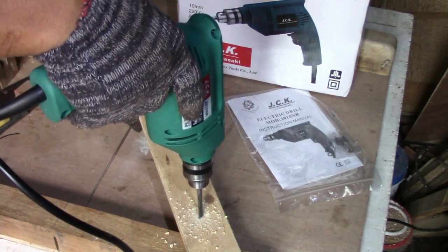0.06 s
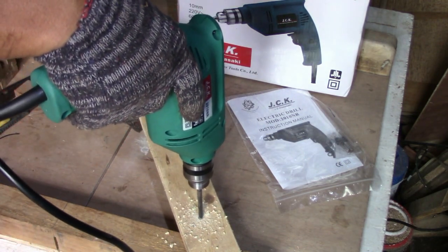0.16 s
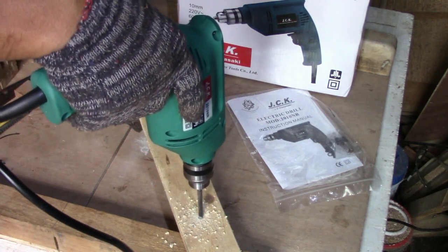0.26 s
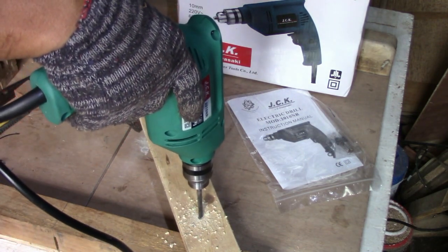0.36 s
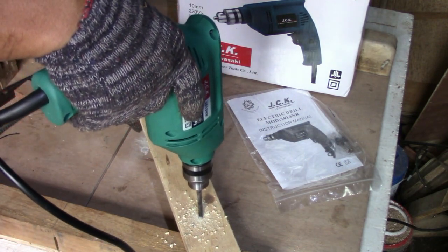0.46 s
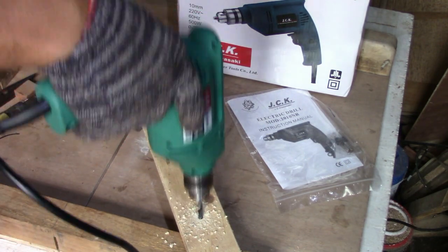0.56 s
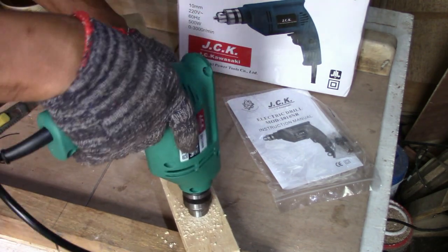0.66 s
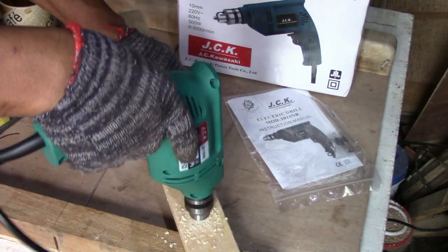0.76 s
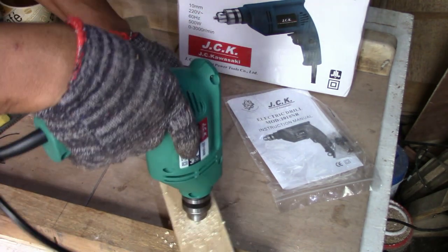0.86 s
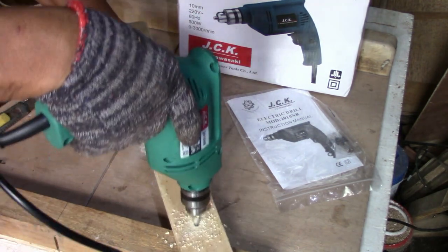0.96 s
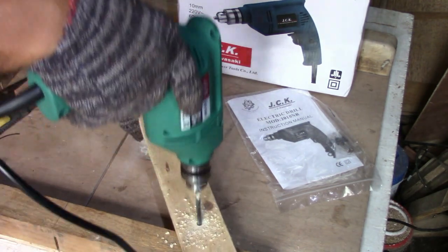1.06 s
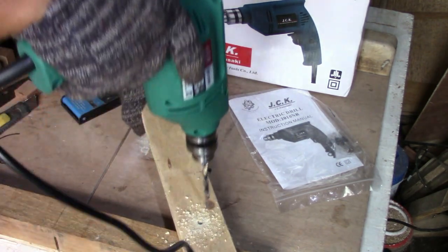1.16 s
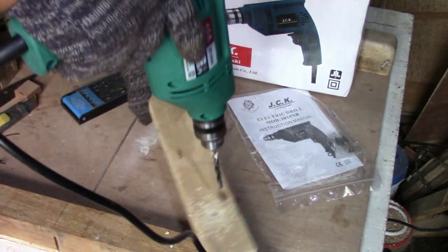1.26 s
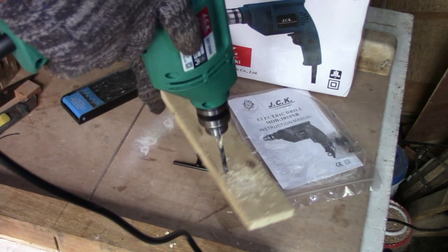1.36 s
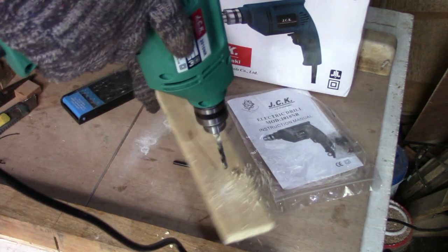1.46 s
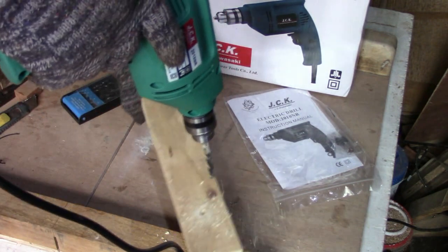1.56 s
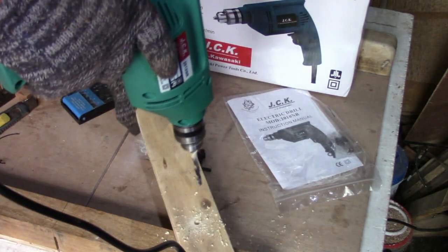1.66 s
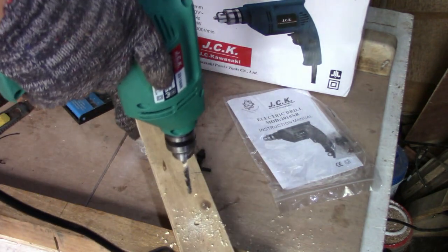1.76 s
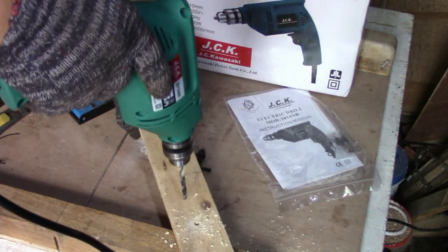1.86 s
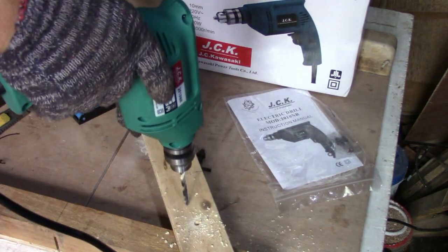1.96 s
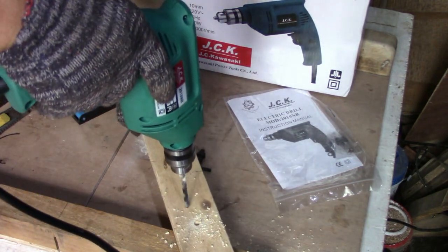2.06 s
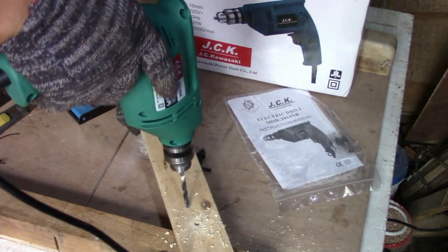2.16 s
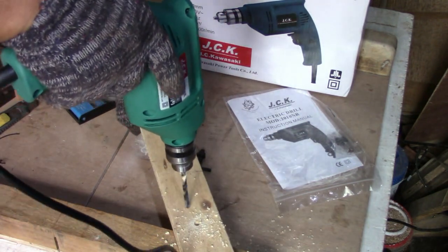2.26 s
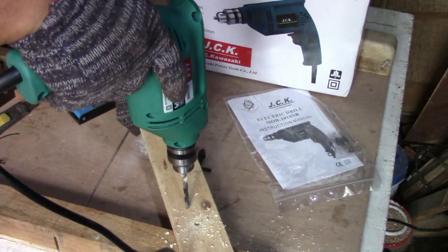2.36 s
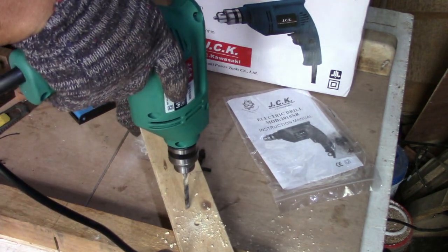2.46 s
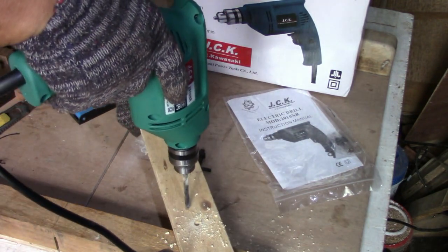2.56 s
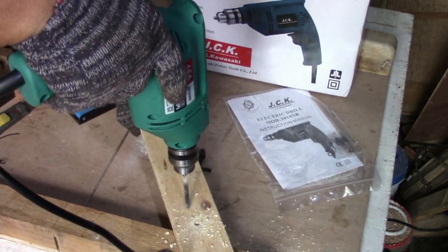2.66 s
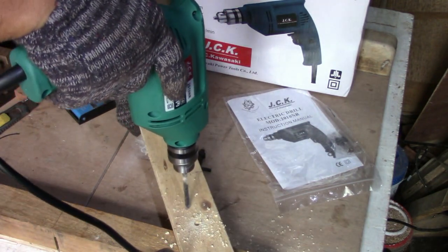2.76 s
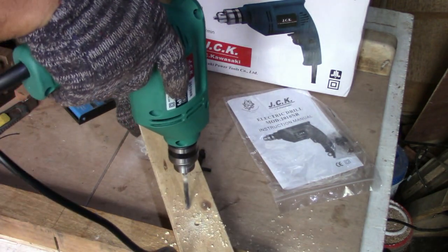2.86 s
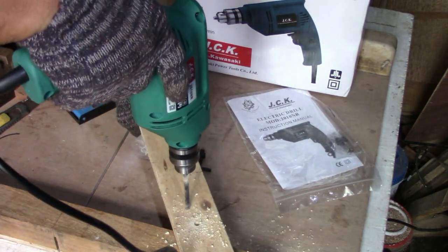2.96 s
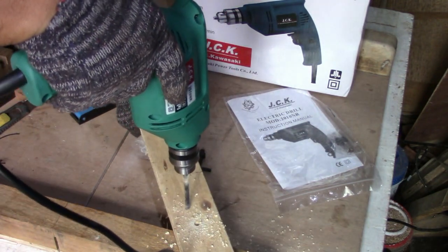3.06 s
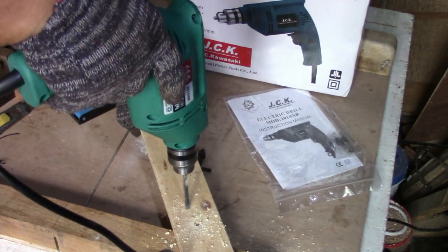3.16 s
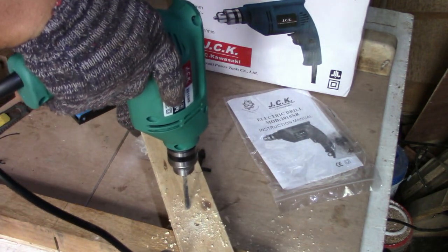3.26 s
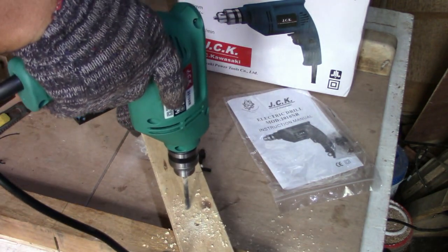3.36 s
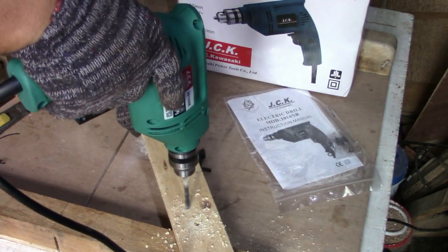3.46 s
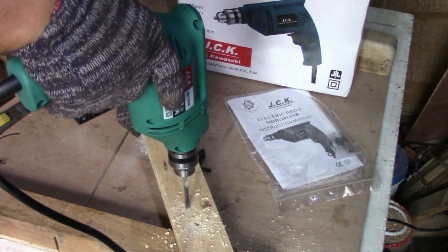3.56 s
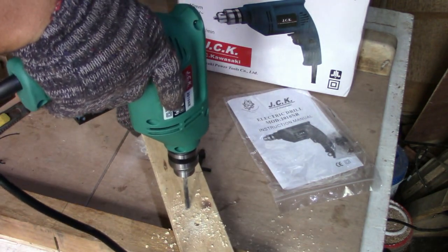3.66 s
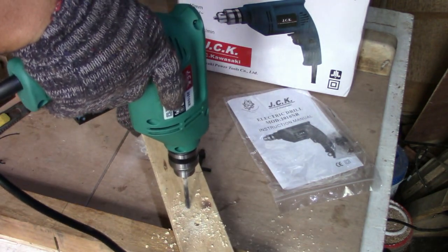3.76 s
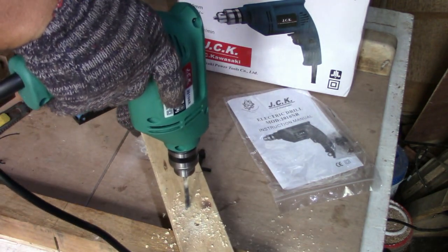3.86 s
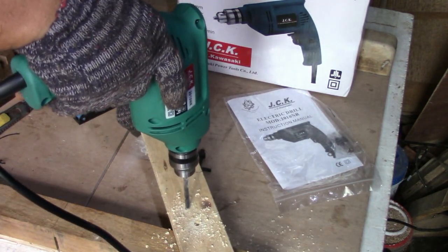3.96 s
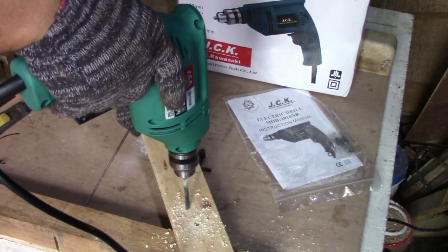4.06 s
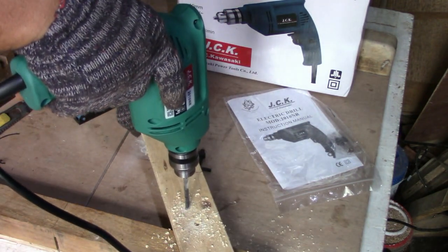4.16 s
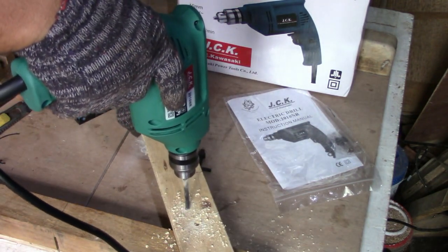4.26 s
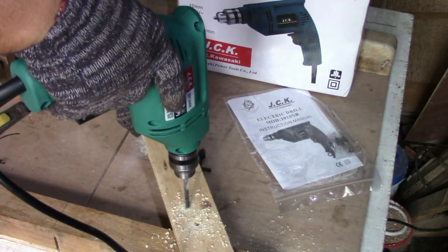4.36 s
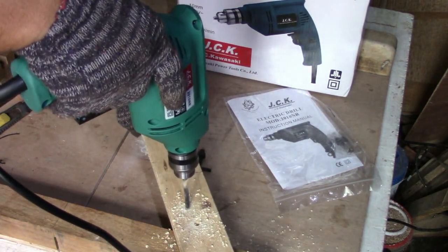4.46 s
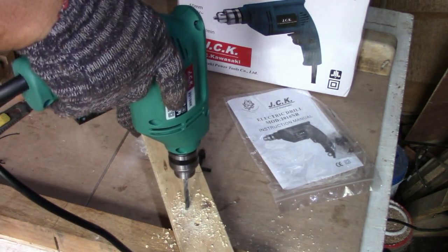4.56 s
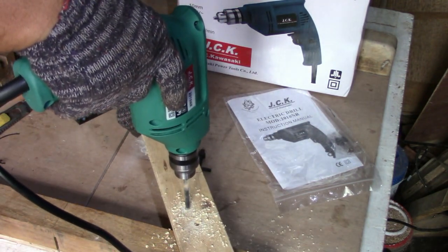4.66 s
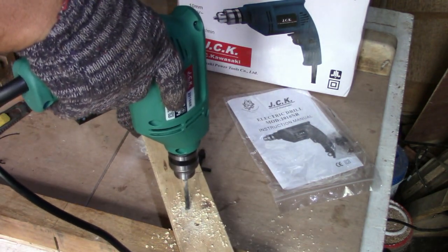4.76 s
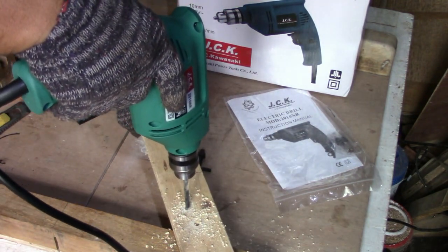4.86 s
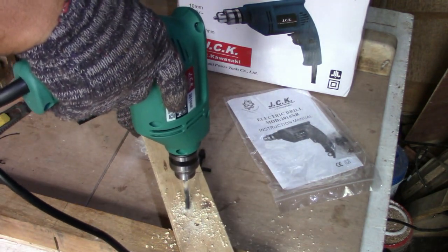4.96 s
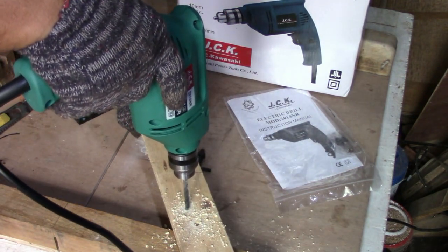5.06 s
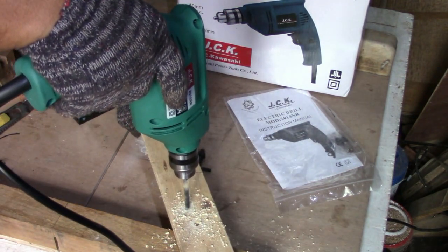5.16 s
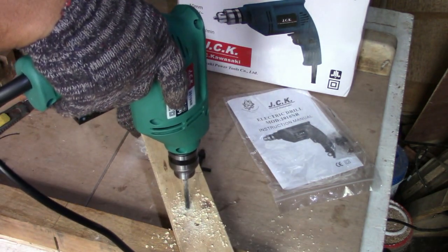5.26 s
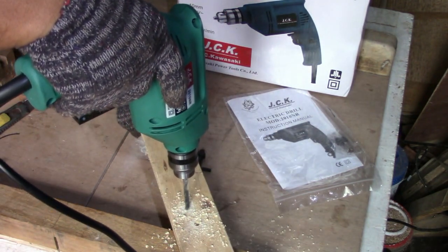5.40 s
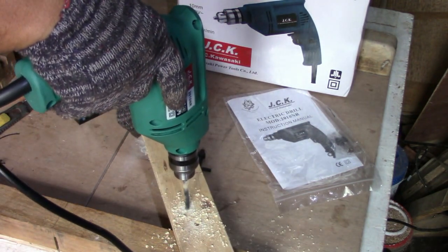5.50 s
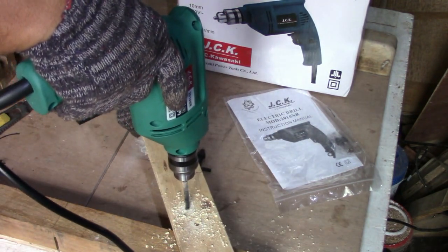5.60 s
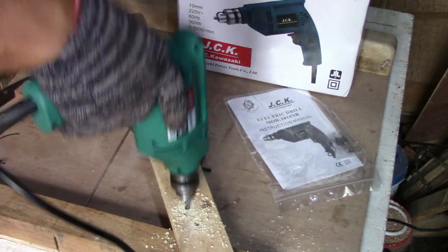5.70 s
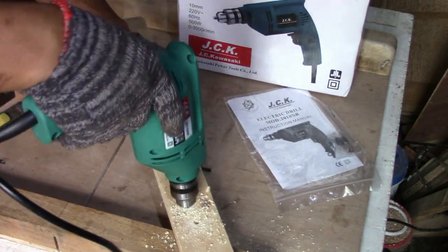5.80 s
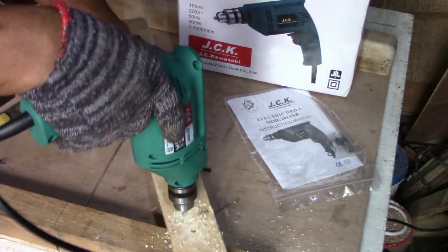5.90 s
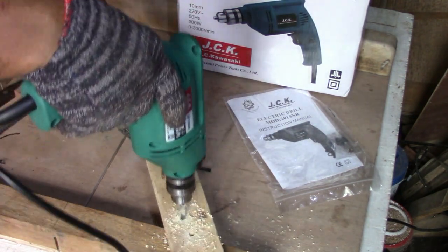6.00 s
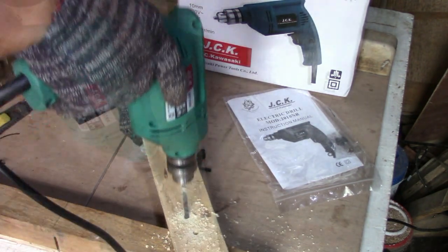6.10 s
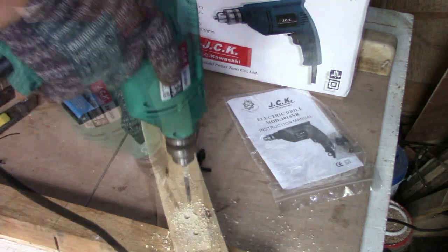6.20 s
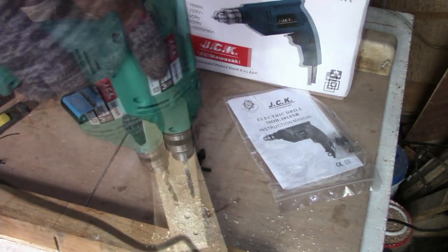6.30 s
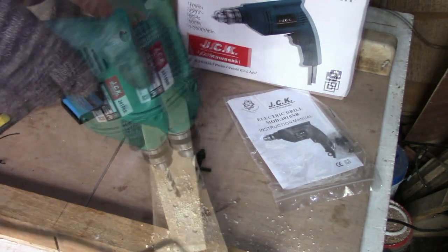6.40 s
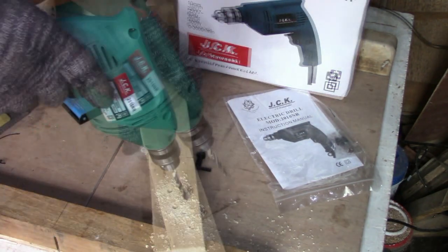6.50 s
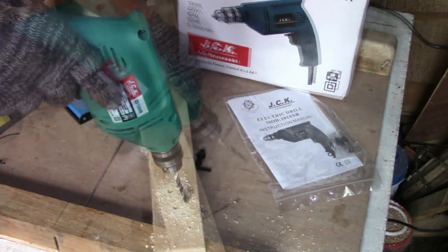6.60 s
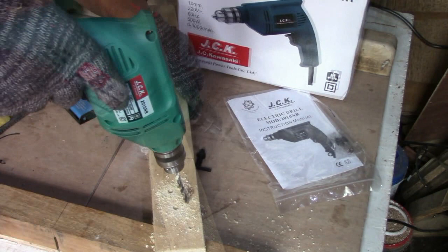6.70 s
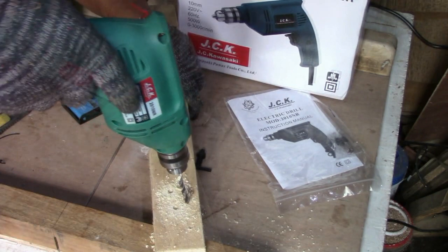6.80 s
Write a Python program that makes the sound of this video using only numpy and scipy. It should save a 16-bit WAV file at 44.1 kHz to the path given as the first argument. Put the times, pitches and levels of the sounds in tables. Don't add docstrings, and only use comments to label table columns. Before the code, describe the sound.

A bright, harsh electric drill is heard very near, bass thin, with slight scattered room reflections. It finishes one hole with dull woody bumps, then rattles unevenly without power while a far motor hums softly. It snaps back up to speed, drills steadily with a buzzing, gritty whine that droops slightly, bumps the plank again and clatters down to quiet.

```python
import sys
import numpy as np
from scipy import signal
from scipy.fft import rfft, irfft
from scipy.io import wavfile
from scipy.ndimage import uniform_filter1d

SR = 44100
rng = np.random.default_rng(int(sys.argv[2]) if len(sys.argv) > 2 else 0)


def pcm_store(signal):
    levels = np.round(np.clip(np.atleast_2d(signal), -1, 1) * 32767)
    wavfile.write(sys.argv[1], SR, levels.astype(np.int16).T)


def natural_amplitude(level_db):
    exponent = np.asarray(level_db, float) / 20
    return 10 ** exponent


N = 301644
T = np.arange(N) / SR

# time in seconds, level in dB, grip of the bit in the wood from 0 to 1.
WORK = [(0, -14.5, 0.6), (.38, -15.5, 0.67), (.61, -13, 0.27), (.86, -17, 0), (1.06, -20.5, .6),
        (1.85, -24.5, 1), (2.44, -24, 0.5), (2.61, -11, 0), (2.88, -13, 0.83), (4.55, -15.5, 0.66),
        (4.68, -16.5, 0.99), (5.35, -17, 0.61), (5.68, -15.5, 0.9), (5.9, -13, 0.07), (6.05, -17, 0.67),
        (6.34, -26.5, 0.9), (6.7, -30, 0.8), (6.84, -39, 0.44)]
# start in seconds, end in seconds, jaw noise in dB against the level,
# top modes of the gear case in dB.
COASTS = [
    (1.02, 2.535, -51, -21),
    (6.134, 7.5, -16, -7.5),
]
# time in seconds, hush just before in dB,
# boom of the bench just after in dB.
LANDINGS = [
    (0.729, -4.5, 8.5),
    (.96, 2, 1),
    (5.835, -2, 0.5),
    (5.99, -3, -2),
]
MAINS_HZ = 119.9
GEAR_RATIO = 15.6
TRIGGER_S = .1
JOLT_S, JOLT_LENGTH_S = 2.51, 0.042


def drill():
    # time in seconds, speed in Hz.
    target_speed = [(0, 414.7), (.458, 412.3), (.648, 268), (.774, 224), (.95, 205), (1.16, 309.5),
                    (2.53, 216), (2.635, 385), (2.994, 443.7), (3.434, 432), (3.774, 427), (4.651, 370.7),
                    (5.286, 382), (5.58, 376), (5.863, 282), (5.987, 368), (6.216, 395), (6.84, 251)]
    # catches in seconds, frees in seconds.
    breaks = [
        (0.649, 1.11),
        (5.8, 6.02),
    ]
    inertia_s = .08
    snag_growth = 4
    goal = np.interp(T, *np.transpose(target_speed))
    keep = np.exp(-1 / (inertia_s * SR))
    speed = goal[0] + signal.lfilter([1 - keep], [1, -keep], goal - goal[0])
    caught = sum(ramp(catch, TRIGGER_S) - ramp(free, TRIGGER_S) for catch, free in breaks)
    jitter = 0.001009 * (1 + snag_growth * caught) * wander(30)
    turns = np.cumsum(speed * (1 + jitter)) / SR

    level, grip = loudness(), np.interp(T, *np.transpose(WORK)[::2])
    coasts = coasting()
    powered = 1 - coasts.sum(0)
    slack = coasting(lead=.07).sum(0)
    rattle_on, rattle_off = 0.2, 0.86
    share = np.clip(rattle_on + (rattle_off - rattle_on) * slack, 0, 1)

    # dB under torque, dB coasting, dB per unit of grip
    layers = ((-24.5, -16.5, 0.42), (-15, -10, 1.85), (-18.5, -19.5, 6.4))
    bench, plank, fizz = (on + (off - on) * slack + per_grip * grip for on, off, per_grip in layers)
    boom_s = 0.031
    bench = bench + sum(boom_db * swell(lands + boom_s, boom_s) for lands, _, boom_db in LANDINGS)
    jolt_db = 4.5 * swell(JOLT_S, JOLT_LENGTH_S)
    bench, plank = bench + jolt_db, plank + jolt_db
    plank = plank + 3.2 * powered * np.cos(2 * np.pi * turns / GEAR_RATIO)

    edges = (900, 2000, 7000)
    gears, jaws = rattle()
    out = np.zeros(N)
    for db, fast, loose in zip((bench, plank, 0, fizz), bands(roar(turns), edges), bands(gears, edges)):
        out += natural_amplitude(db) * (np.sqrt(1 - share) * evened(fast) + np.sqrt(share) * evened(loose))
    out = natural_amplitude(-1.03 - 0.53 * (1 - powered)) * out
    out += (natural_amplitude(np.transpose(COASTS)[2]) @ coasts) * jaws
    out += natural_amplitude(-9) * (1 - powered) * brushes(turns)
    whine_gain = natural_amplitude(-9 + 9 * grip + hush()) * powered ** 2
    return natural_amplitude(level) * out + whine_gain * whine(speed, turns)


def roar(turns):
    # frequency in Hz, density in dB per Hz.
    air_spectrum = [(40, -64), (130, -32.5), (250, -35), (500, -26), (1000, -19), (1410, -10),
                    (2990, -18.5), (3640, 0), (4030, -20.5), (4450, -6), (8500, -23.5), (10100, -13),
                    (12700, -31), (15500, -63)]
    beat_db = .9 * np.cos(2 * np.pi * MAINS_HZ * T)
    beat_db += 1.6 * np.cos(2 * np.pi * turns) + 0.59 * np.cos(np.pi * turns)
    beat_db += 0.077 * np.cos(2 * np.pi * turns / GEAR_RATIO)
    beat_db += 0.55 * wander(25) + 0.76 * wander(250)
    noise = natural_amplitude(beat_db) * rng.standard_normal(N)
    return colour(noise, lambda hz: housing_db(air_spectrum, hz, 4.35, -0.45))


def whine(speed, turns):
    orders = [3, 4, 6, 7, 8.5, 9, 10, 11, 12, 12.5, 13, 13.5, 14.5, 15, 16, 18, 22]
    order_levels = [-45, -46, -43, -48, -38, -39, -35, -47, -42, -46, -47, -50, -46, -48, -51, -53, -53]
    # frequency in Hz, width in Hz, peak in dB.
    modes = [(1242, 79, 10.5), (1743, 60, 11.5), (2633, 150, 5), (2830, 250, 12), (3480, 260, 14.5),
             (3731, 57, 16.5), (4510, 170, 17), (4810, 34, 18), (5800, 290, 17)]
    mesh_order = 10
    notch_hz, notch_width_hz, notch_db = 4000, 270, -10
    out = np.zeros(N)
    pull = np.clip(np.gradient(speed) * SR / 400, -1, 1)
    for k, db in zip(orders, order_levels):
        hz = k * speed
        if k == mesh_order:
            torque_db = 3.5 * abs(pull) - 6 * np.log2(speed / 340) * np.maximum(pull, 0)
        else:
            torque_db = -12 * abs(pull) * (k > 12) + 18 * np.log2(speed / 400)
        dip_db = notch_db * np.exp(-(2 * (hz - notch_hz) / notch_width_hz) ** 2)
        power = sum(natural_amplitude(top_db) ** 2 / (1 + (2 * (hz - f) / w) ** 2) for f, w, top_db in modes)
        gain = np.sqrt(1 + power) * natural_amplitude(db + dip_db + torque_db + 5.5 + 2.0 * wander(3.0))
        out += gain * np.cos(2 * np.pi * (k * turns + rng.random()))
    mains_beat = 0.13 * np.cos(2 * np.pi * MAINS_HZ * T)
    chuck_beat = 0.16 * np.cos(2 * np.pi * turns / GEAR_RATIO)
    return out * (1 + mains_beat + chuck_beat)


def rattle():
    # frequency in Hz, density in dB per Hz.
    gear_spectrum = [(24, -85), (40, -53), (150, -59), (223, -20), (253, -22), (387, -11.5), (472, -11),
                     (777, -7.5), (1490, 7.5), (2570, -3), (3470, -2), (4130, -13), (5850, -6),
                     (12400, -27.5), (15500, -44)]
    count = np.cumsum(112 * (1 + .25 * wander(60))) / SR
    sizes = natural_amplitude(4.5 * np.minimum(rng.exponential(1, N), 2))
    strikes = np.diff(np.floor(count), prepend=0) * sizes
    strikes = np.convolve(strikes, np.exp(-np.arange(300) / 70))[:N] * rng.standard_normal(N)
    whirr = natural_amplitude(0.5 * wander(43)) * rng.standard_normal(N)
    drive = 0.63 * evened(strikes) + 0.7 * whirr
    jaws = colour(drive * natural_amplitude(4.5 * wander(25)), lambda hz: -10 * np.log10(1 + ((hz - 9750) / 450) ** 4))
    return colour(drive, lambda hz: housing_db(gear_spectrum, hz, -1.2, 1.3)), evened(jaws)


def brushes(turns):
    ticks = np.zeros(N)
    for k in range(20, 60):
        ticks += natural_amplitude(2.2 * wander(5) - 3 * (k % 2)) * np.cos(np.pi * k * turns + 7 * rng.random())
    return evened(colour(ticks, lambda hz: -10 * np.log10(1 + ((hz - 5700) / 900) ** 4)))


def housing_db(base, hz, under_db, ring_db):
    # frequency in Hz, width in Hz, peak in dB.
    modes = [(1260, 71, -5.0), (1566, 23, 4), (1752, 41, 1), (2401, 16, 1), (2770, 22.5, 3.0),
             (3660, 630, -7), (4325, 245, -1.5), (4730, 40, 3), (5900, 270, -10), (6660, 18, 0),
             (3025, 71, -3.5), (3400, 37, 3.5), (3543, 17, 10.0), (3755, 38, 4.0), (5030, 31, -23),
             (2200, 8.3, -5.5), (11300, 150, -15.5), (9680, 230, -13), (13700, 600, -34)]
    rings = sum(natural_amplitude(db) ** 2 / (1 + (2 * (hz - f) / w) ** 2) for f, w, db in modes)
    rings = rings / (1 + (1100 / (hz + 1)) ** 6)
    return 10 * np.log10(natural_amplitude(read(base, hz) + under_db) ** 2 + natural_amplitude(ring_db) ** 2 * rings)


def loudness():
    s, db, _ = np.transpose(WORK)
    return np.interp(T, s, db) + hush() + 3 * swell(JOLT_S, JOLT_LENGTH_S)


def hush():
    lead_s = 0.026
    return sum(hush_db * swell(lands - lead_s, lead_s) for lands, hush_db, _ in LANDINGS)


def coasting(lead=0):
    return np.array([ramp(off, TRIGGER_S) - ramp(on - lead, TRIGGER_S) for off, on, *_ in COASTS])


def knocks():
    # group from 0 (low) to 3 (top), frequency in Hz, 60 dB decay in seconds.
    case_modes = [(0, 1520, .016), (0, 1750, .012), (1, 2950, .01), (1, 3500, .02), (1, 3700, .014),
                  (2, 4500, .012), (2, 5100, .009), (2, 5900, .008), (3, 9500, .014), (3, 10100, .012)]
    # start in seconds, peak in dB, pitch in Hz, 60 dB decay in seconds.
    bumps = [(0.726, -25, 824, 0.066), (0.75, -26, 1010, 0.06), (0.778, -33, 905, 0.046),
             (0.964, -30, 675, 0.17), (1.072, -23, 690, 0.042), (1.098, -26, 520, 0.049),
             (5.839, -24, 633, 0.074), (5.868, -21, 965, 0.055), (5.899, -39, 940, 0.06),
             (6.049, -41, 877, 0.044), (6.591, -27.5, 895, 0.051)]
    out, t = np.zeros(N), np.arange(6000) / SR
    short = t[:1500]
    group, mode_hz, mode_t60 = np.transpose(case_modes)[:, :, None]
    strikes = loose_strikes()
    chances = rng.random((len(strikes), 3, len(case_modes), 1))
    for (s, db, low, high, top), luck in zip(strikes, chances):
        start_db = np.array([low, 0, high - 1.5, top])[group.astype(int)] - 5 * luck[0]
        phase = mode_hz * (1 + 0.069 * (luck[1] - .5)) * short + 0.1 * luck[2]
        modes = natural_amplitude(start_db - 60 * short / (1.38 * mode_t60)) * np.sin(2 * np.pi * phase)
        ring = modes.sum(0) * np.minimum(short / 0.00043, 1)
        add(out, s - .0006, natural_amplitude(db - 1.1) * ring / abs(ring).max())
    for s, db, hz, t60 in bumps:
        thud = np.sin(2 * np.pi * hz * t)
        thud += .5 * np.sin(2 * np.pi * 1.1 * hz * t) + 0.17 * np.sin(2 * np.pi * 0.544 * hz * t)
        add(out, s, natural_amplitude(db - 60 * t / t60) * thud * np.minimum(t / 0.0018, 1))
    return out


def loose_strikes():
    # time in seconds, peak in dB, low modes and high modes in dB
    clacks = [(1.1672, -20, -9, 10), (1.225, -12, -8, 14), (1.2906, -7, -12, 0), (1.351, -13, 2, 6),
              (1.4253, -6.5, -8, 0), (1.475, -5, 3, -10), (1.495, -8.5, 1, -2), (1.5567, -8, -17, -11),
              (1.6129, -5.5, -3, -1), (1.633, -6, -16, 0), (1.798, -11, -2, 6), (1.9227, -8, 1, 3),
              (2.0043, -10.5, -14, -9), (2.1477, -8, -1, -6), (2.275, -10, -3, -1), (6.17, -9.5, -8, 11),
              (6.193, -10, -5, 4), (6.2545, -13, -6, 13), (6.2993, -12, -15, 8), (6.3724, -10, -3, 6),
              (6.4093, -9.5, 0, 13), (6.4292, -9.5, -4, 1), (6.4703, -7.5, 1.5, 5), (6.496, -12, -12, -1),
              (6.5425, -10, -5, 2), (6.584, -11.5, -2, -12), (6.611, -11.5, -11, -2),
              (6.6418, -12.5, -26, -2), (6.728, -15, -20, -2), (6.777, -21, -17, 7)]
    gap_s, over_db, spread_db = .042, 10.5, 20
    level = loudness()
    rows = [(*row, COASTS[int(row[0] > COASTS[1][0])][3]) for row in clacks]
    for off, on, *_, top in COASTS:
        slots = np.arange(off + TRIGGER_S, min(on - TRIGGER_S, T[-1] - gap_s), gap_s)
        for s, (late, size, low, high) in zip(slots, rng.random((len(slots), 4))):
            s += late * gap_s
            db = level[int(s * SR)] + over_db - 5 * size
            rows.append((s, db, -spread_db * low, spread_db * (high - .5), top))
    return rows


def hum():
    # frequency in Hz, rms level in dB.
    hum_lines = [(156.1, -58), (258.4, -58), (306.8, -63), (414.5, -54), (479.1, -51), (522.2, -56),
                 (597.5, -53), (882.9, -52)]
    lull_db, duck_db, fade_s, fade_db = 1, -8.5, 0.46, -4
    drone_db = 12 * (swell(1.6, .3) - .8)
    lines = np.zeros(N)
    for i, (hz, db) in enumerate(hum_lines):
        gain = natural_amplitude(db + 3 + 2 * wander(3) + (i == 0) * drone_db)
        lines += gain * np.cos(2 * np.pi * (hz * T + rng.random()))
    fade = fade_db * ramp(T[-1] - fade_s / 2, fade_s)
    return lines * natural_amplitude(duck_db + (lull_db - duck_db) * coasting()[0] + fade)


def evened(x):
    return x / np.sqrt(np.mean(x ** 2) + 1e-20)


def read(points, hz):
    f, value = np.transpose(points)
    return np.interp(np.log(hz + 1), np.log(f + 1), value)


def wander(hz):
    knots = rng.standard_normal(int(N / SR * 2 * 400) + 9)
    width = int(300 / hz) + 1
    smooth = uniform_filter1d(uniform_filter1d(knots, width), width)
    return np.interp(T * 800, np.arange(len(knots)), evened(smooth))


def colour(x, db_of, size=8192):
    log_gain = np.maximum(db_of(abs(np.fft.fftfreq(size, 1 / SR))), -100) * np.log(10) / 20
    taps = np.fft.ifft(np.exp(np.conj(signal.hilbert(log_gain)))).real[:size // 2]
    return signal.oaconvolve(x, taps)[:N]


def bands(x, edges):
    hz, z = np.fft.rfftfreq(N, 1 / SR), rfft(x)
    above = [1] + [1 / (1 + (e / (hz + 1)) ** 12) for e in edges] + [0]
    return [irfft(z * (a - b), N) for a, b in zip(above, above[1:])]


def add(mix, s, sound):
    part = mix[round(s * SR):][:len(sound)]
    part += sound[:len(part)]


def ramp(s, length):
    return np.clip((T - s) / length + .5, 0, 1)


def swell(s, length):
    return np.exp(-((T - s) / length) ** 2)


def scene():
    # frequency in Hz, side against mid in dB.
    side_spectrum = [(60, -8), (150, -48), (380, -23), (950, -14), (2380, -8), (5980, -7), (15000, 1)]
    # frequency in Hz, left against right in dB.
    tilt = [(60, 0), (180, 0.8), (550, -2.5), (1650, -2.2), (4970, -1.2), (15000, -0.5)]
    mid = drill() + knocks() + hum()
    t = np.arange(9000) / SR
    echoes = rng.choice([-1., 1.], len(t)) * (rng.random(len(t)) < .06) * natural_amplitude(-60 * t / 0.2)
    scattered = signal.oaconvolve(mid, echoes / np.linalg.norm(echoes))
    side = colour(scattered, lambda hz: read(side_spectrum, hz) - 2.0)
    left = colour(mid + side, lambda hz: .5 * read(tilt, hz))
    right = colour(mid - side, lambda hz: -.5 * read(tilt, hz))
    return np.array([left, right])


def roll_off(x):
    return signal.sosfilt(signal.butter(12, 15620, fs=SR, output="sos"), x)


def record(dry):
    limited = 1.2 * np.tanh(dry / 1.2)
    cut = np.array([colour(ear, lambda hz: -10 * np.log10(1 + (210 / (hz + 1)) ** 7)) for ear in limited])
    loud = np.sqrt(uniform_filter1d(dry ** 2, 4000))
    lumps = natural_amplitude(7.7 * wander(4.2))
    rumble = []
    for _ in dry:
        noise = lumps * rng.standard_normal(N)
        rumble.append(evened(colour(noise, lambda hz: -10 * np.log10(1 + ((hz - 75) / 40) ** 4))))
    return roll_off(cut + natural_amplitude(-57) * loud * np.array(rumble))


dry = scene()
out = record(dry)
pcm_store(out)
```